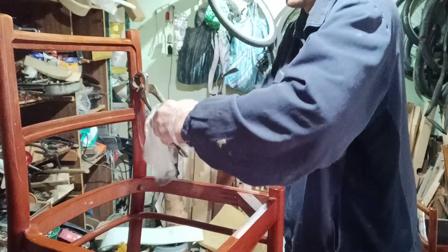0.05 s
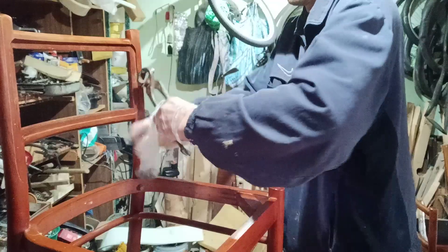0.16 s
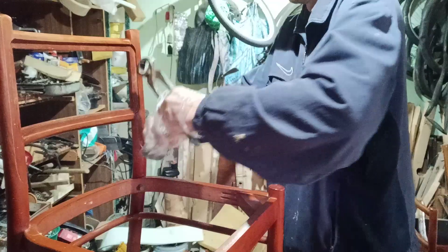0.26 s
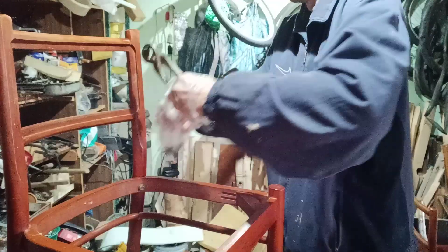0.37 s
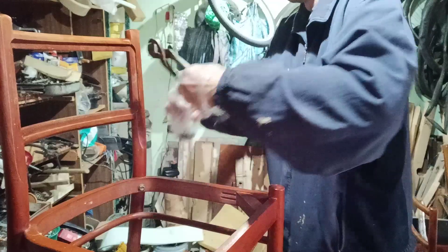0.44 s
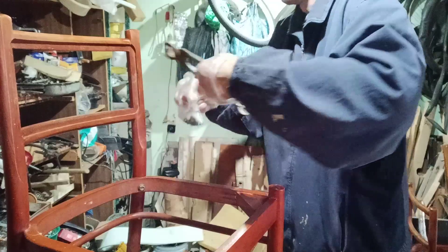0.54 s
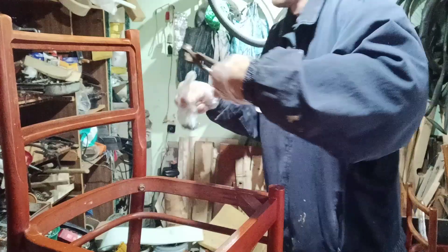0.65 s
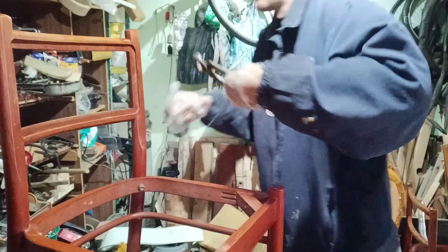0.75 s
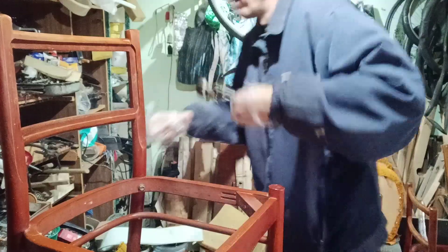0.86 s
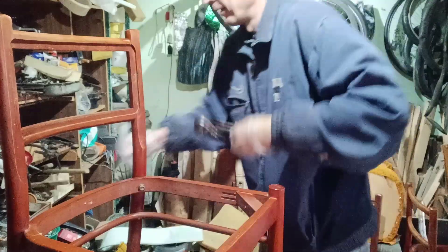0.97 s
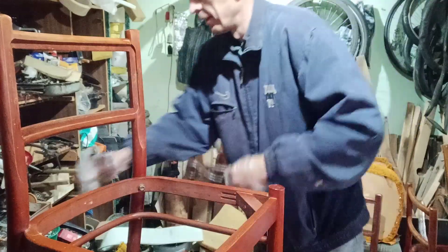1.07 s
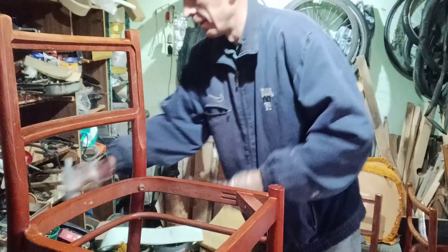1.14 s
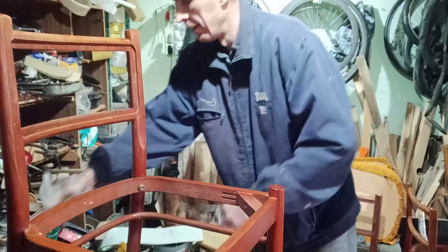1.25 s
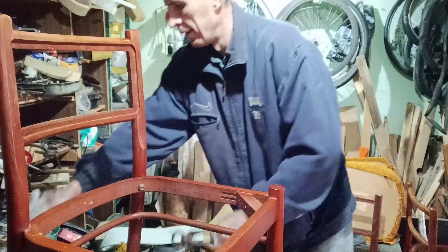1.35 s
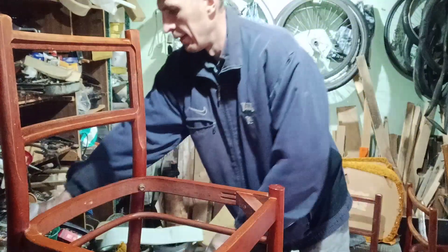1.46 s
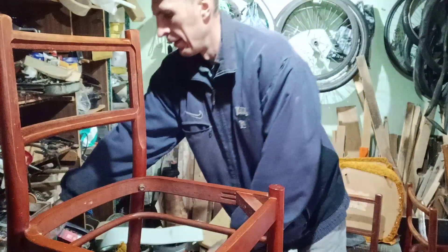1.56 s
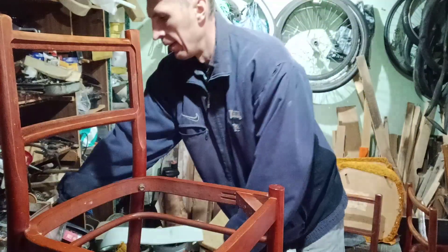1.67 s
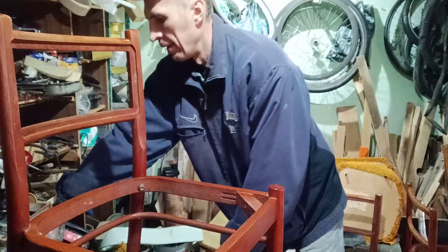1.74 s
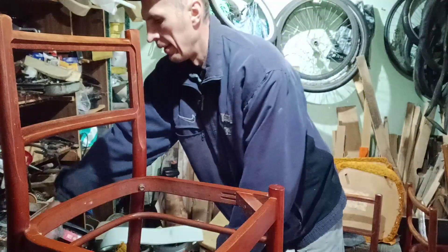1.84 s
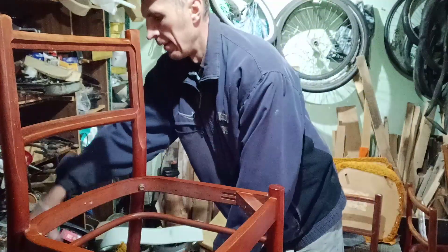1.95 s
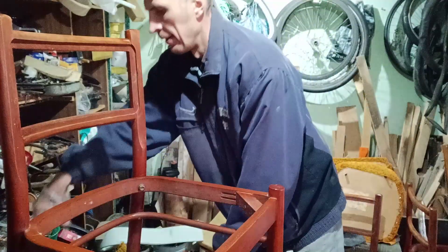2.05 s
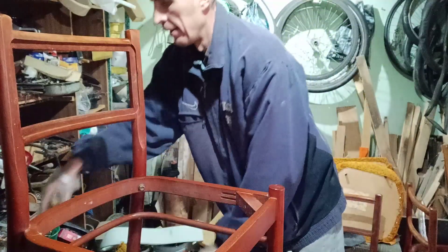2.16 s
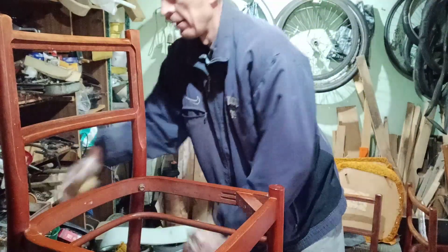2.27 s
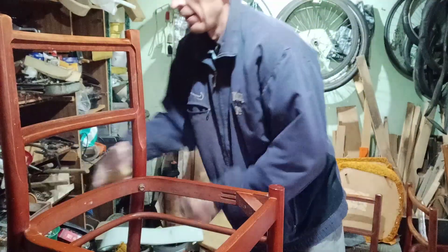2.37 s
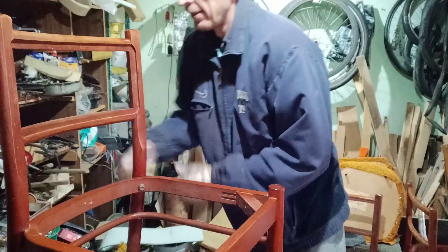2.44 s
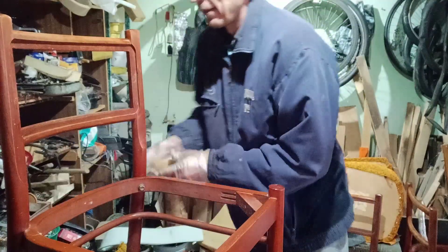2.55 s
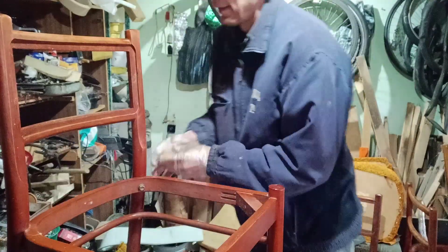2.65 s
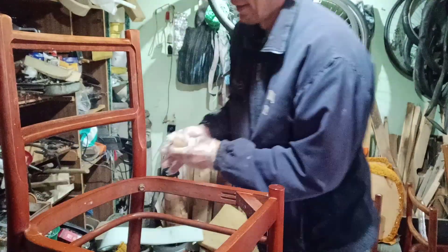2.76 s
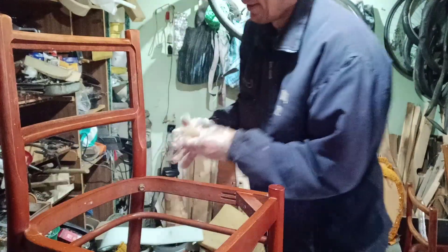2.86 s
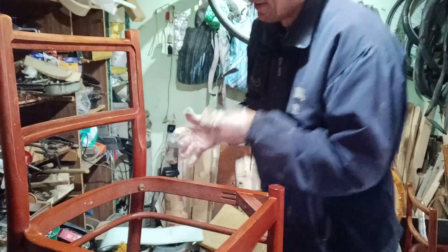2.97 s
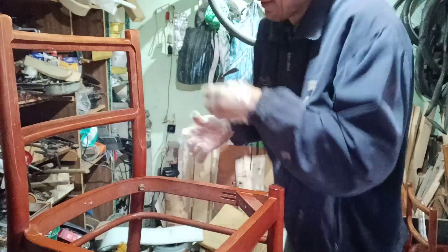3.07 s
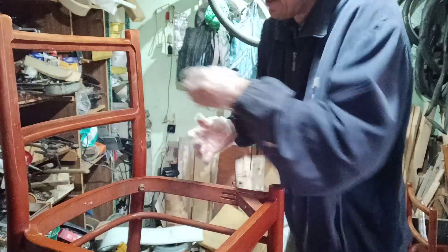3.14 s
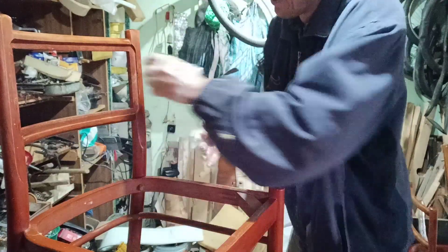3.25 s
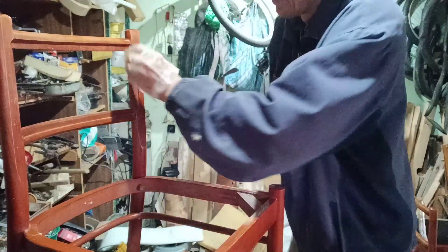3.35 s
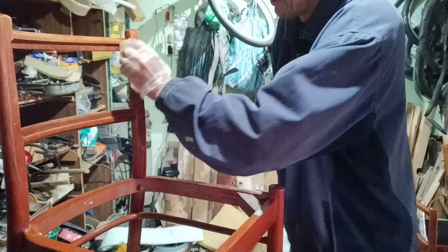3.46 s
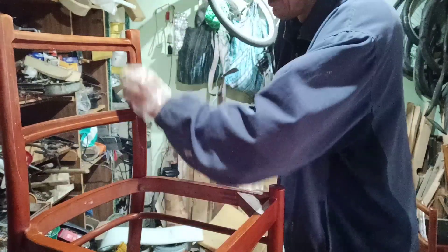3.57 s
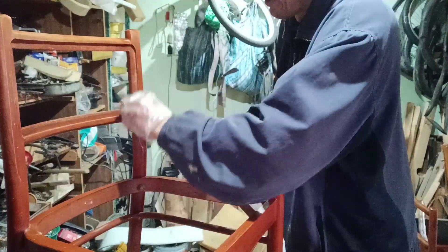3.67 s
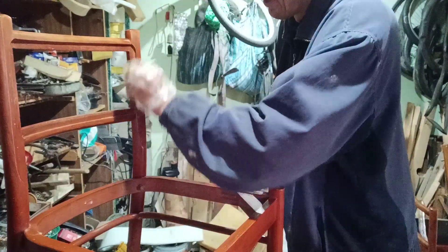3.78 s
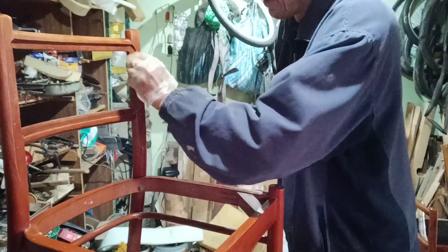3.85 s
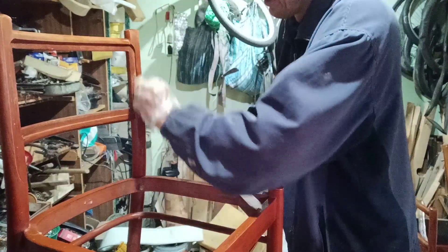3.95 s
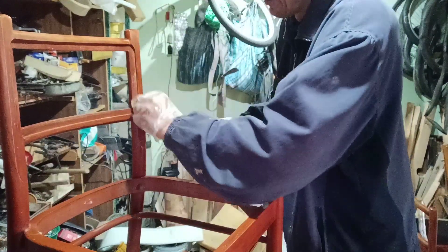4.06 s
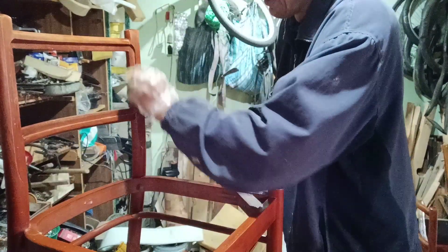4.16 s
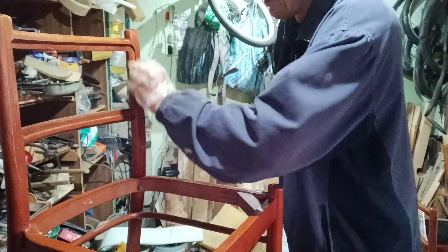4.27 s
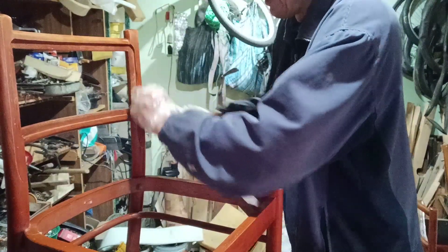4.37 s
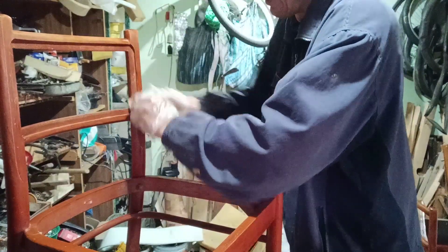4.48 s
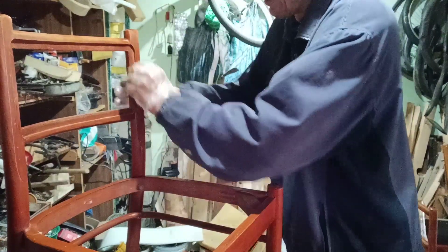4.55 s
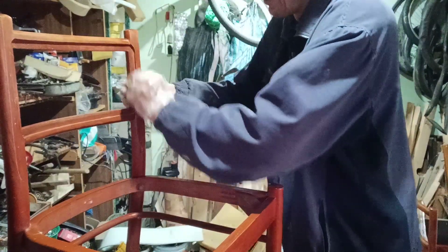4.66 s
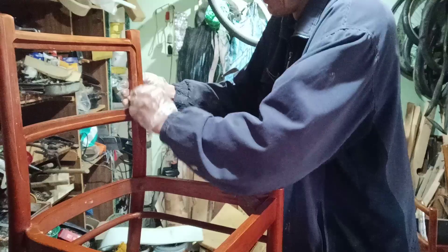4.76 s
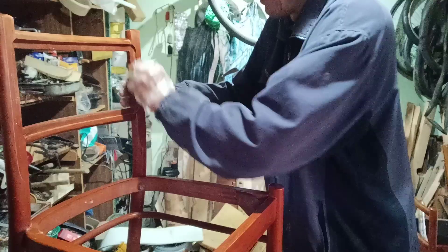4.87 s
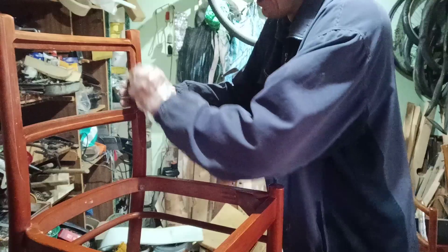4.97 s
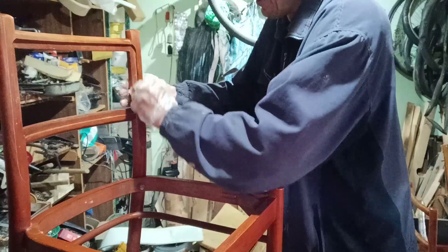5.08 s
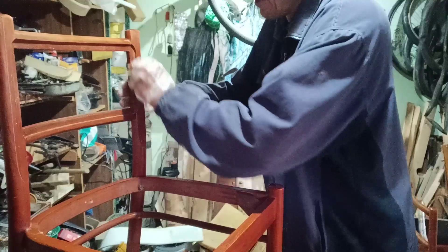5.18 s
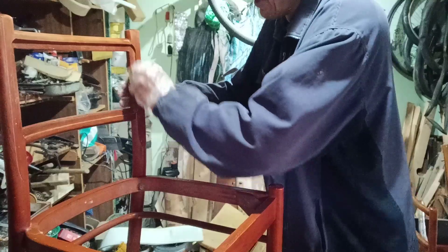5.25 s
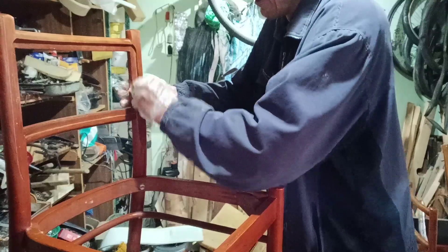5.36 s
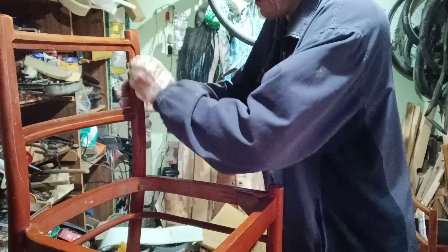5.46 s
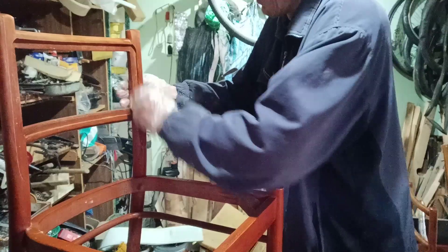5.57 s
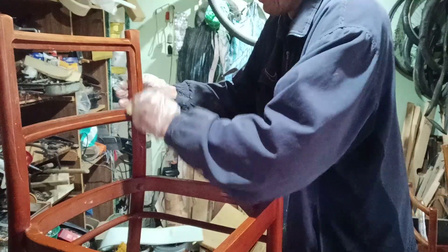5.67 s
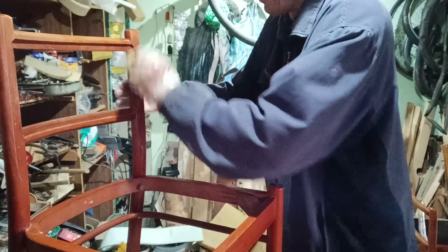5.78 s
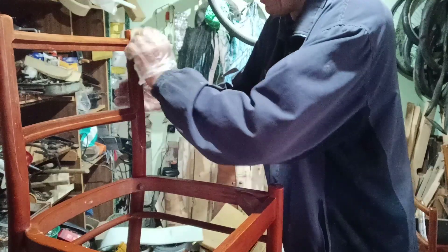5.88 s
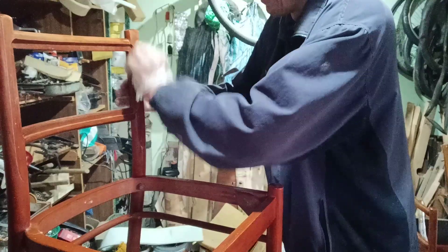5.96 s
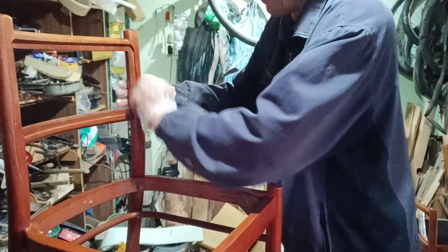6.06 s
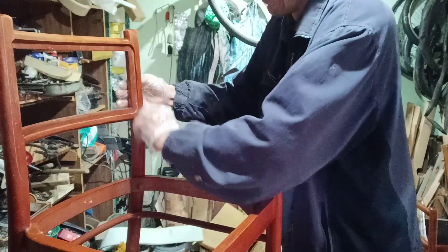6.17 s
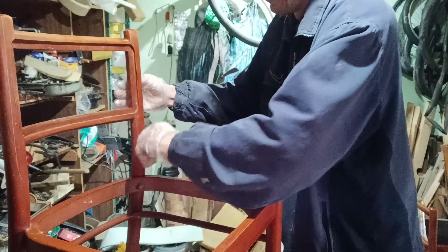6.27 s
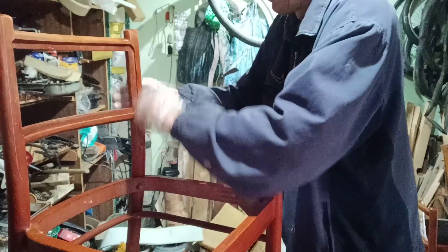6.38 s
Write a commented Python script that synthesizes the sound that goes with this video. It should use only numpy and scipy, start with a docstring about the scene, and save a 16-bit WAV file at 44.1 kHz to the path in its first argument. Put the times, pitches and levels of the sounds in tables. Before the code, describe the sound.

A close, bright, single-channel pickup in a small cluttered workshop with short, dense reflections and faint steady hiss. At 0 s a thin rough scrape fades on the chair post while a jacket swishes and the frame gives soft low thumps until 0.3 s. A light click comes at 0.5, a sharper cluster at 0.9, then hard clicks at 1.3, 1.6, 1.7 and 1.75. Pliers knock on a wooden shelf at 1.8, then rapidly from 2.04 to 2.13, with a brief shimmering steel ring; a weaker knock follows at 2.3. Sleeve rustle swells around 2.6 and thins by 3.4. From 3.6 to the end near 6.4 s, a rag wipes the lacquered backrest in short strokes. The frame shudders and thumps dully, with low groans at 4.0, 4.4 and 6.1, and small rising squeaks, mostly between 5.3 and 5.8. The last rub dies away into hiss.

```python
"""In a small, cluttered workshop a lacquered wooden chair is wiped with a rag, close to the microphone.
A jacket swishes, pliers click and are laid down with wooden knocks and a short metal ring.
Then the rag rubs the backrest in short strokes; the frame thumps, groans and squeaks under the hand.
Cloth is filtered noise, blows are noise bursts through resonances, and the tones are sines.
Clustered reflections die away around the blows; a faint hiss of the room lies beneath."""
import sys
import numpy as np
from scipy import signal
from scipy.fft import rfft, irfft, next_fast_len
from scipy.io import wavfile
from scipy.ndimage import map_coordinates

SR = 44100
rng = np.random.default_rng(int(sys.argv[2]) if len(sys.argv) > 2 else 0)


def generate_wav(sig):
    """Save sig (samples, or channels by samples) to the path in sys.argv[1] as 16-bit PCM at SR."""
    pcm = np.round(np.clip(np.atleast_2d(sig).T, -1, 1) * 32767).astype(np.int16)
    wavfile.write(sys.argv[1], SR, pcm)


N = 283122   # samples
T = np.arange(N) / SR   # seconds

# resonances of the chair frame: centre_hz, width_hz, level_db
FRAME_MODES = [(116, 35.6, -1), (137.8, 9.3, 6), (211.4, 11.4, 6.5), (276, 39, -0.5), (319.3, 27, -2.5),
               (379, 13, -4.5), (629, 59, -27.5), (870, 120, -55)]


def from_db(db):
    """Decibels to gain."""
    return 10 ** (np.asarray(db) / 20)


def rms(x):
    """Root mean square."""
    return np.sqrt(np.mean(x ** 2) + 1e-20)


def at_hz(points, hz):
    """Read a table on a log-frequency axis."""
    f, value = np.transpose(points)
    return np.interp(np.log(hz + 1e-9), np.log(f), value)


def cut(x, hz, kind, order=2):
    """Causal Butterworth filter."""
    edge_hz = np.clip(hz, 10, .45 * SR)
    return signal.sosfilt(signal.butter(order, edge_hz, kind, fs=SR, output="sos"), x)


def resonate(x, hz, width_hz):
    """Two-pole resonance with gain 1 on top."""
    r = np.exp(-np.pi * width_hz / SR)
    zeros = np.array([1, 0, -1]) * (1 - r * r) / 2
    poles = [1, -2 * r * np.cos(2 * np.pi * hz / SR), r * r]
    return signal.lfilter(zeros, poles, x + 1e-18)


def body(x, modes):
    """Parallel resonances of alternating sign."""
    return sum((-1) ** k * from_db(db) * resonate(x, hz, width_hz)
               for k, (hz, width_hz, db) in enumerate(modes))


def colour(x, spectrum):
    """Filter a steady sound by a table of frequency and gain."""
    size = next_fast_len(N)
    hz = np.arange(size // 2 + 1) * SR / size
    return irfft(rfft(x, size) * from_db(at_hz(spectrum, hz)), size)[:N]


def drift(per_s):
    """Slow chance with a spread near 1: random points joined by straight lines."""
    return np.interp(T * per_s, np.arange(4000), rng.standard_normal(4000))


def swell(s, rise_s, fall_s):
    """A rounded rise and fall around one moment; a rise or fall time away it is just under half height."""
    side_s = np.where(T < s, rise_s, fall_s)
    return 1 / np.cosh(np.clip(1.405 * (T - s) / side_s, -20, 20))


def add(out, s, sound):
    """Mix a sound in at a time."""
    start = int(s * SR)
    out[start:start + len(sound)] += sound[:N - start]


def at_level(blow, db):
    """Set the level of a blow's first 30 ms."""
    return from_db(db) * blow / rms(blow[:SR * 3 // 100])


def cloth():
    """The jacket swishes brightly as the arm moves; the rag rubs lower on the lacquer."""
    # timbre of the jacket, then of the rag: freq_hz, relative_db
    jacket_spectrum = [(200, -28.5), (550, -27), (800, -25), (1200, -21.5), (2000, -26.5), (3000, -20),
                       (4200, -2), (6000, -1.5), (7500, 2.5), (9000, 1.5), (11500, 3.5), (15000, 6)]
    rag_spectrum = [(200, -15), (500, -22), (800, 0), (1150, -9.5), (1500, -3.5), (3000, 3.5), (4500, 2.5),
                    (6000, -3), (8000, -2.5), (11000, -10.5), (15000, -11)]
    jacket_gain, rag_gain = effort()
    room = workshop(direct_db=11.5)
    jacket = signal.fftconvolve(friction(350, grain_db=-13.0, flutter_db=0.85), room)[:N]
    rag = signal.fftconvolve(friction(1100, grain_db=-14.5, flutter_db=2.5), room)[:N]
    jacket = colour(moving(jacket, echo_gain=0.26, travel_s=.00008), jacket_spectrum)
    rag = colour(moving(rag, echo_gain=0.46, travel_s=.00009), rag_spectrum)
    # each gain sets the level in the band where that cloth is judged
    jacket /= rms(cut(jacket, [9000, 15500], "band"))
    rag /= rms(cut(rag, [1500, 4500], "band"))
    return jacket * jacket_gain + rag * rag_gain


def effort():
    """Gains of jacket and rag: the arms' long motion, then one swell for each stroke; their powers add."""
    # the arms move without a pause until the wiping starts: time_s, swish_db (before the trim below)
    arm_motion = [(0.0, -56), (0.16, -53.5), (0.33, -50), (0.4, -51.5), (0.58, -54), (0.82, -63.5),
                  (1.01, -60), (1.26, -66), (1.4, -56.5), (1.66, -53.5), (2.64, -49.5), (3.17, -68),
                  (3.32, -56.5), (3.43, -73)]
    # stray brushes at first, then the wipes: height_s, rag_db, sleeve_db, rise_s, fall_s
    strokes = [(.245, -52.5, -46, 0.066, 0.043), (.46, -61, -54.5, 0.15, .07),
               (.67, -64.5, -58, .025, 0.016), (.84, -69.5, -54, 0.057, 0.037),
               (1.26, -66, -61, 0.084, 0.088), (2.0, -54.5, -57, 0.018, 0.14), (2.37, -64.5, -65, .05, .05),
               (2.59, -60.5, -59, .08, .1), (2.81, -59, -52, .03, 0.066), (3.139, -73.5, -56, .06, .13),
               (3.57, -71.5, -59, .06, .08), (3.648, -48.5, -49.5, 0.0057, 0.038),
               (3.74, -79, -59, 0.024, 0.03), (3.84, -85, -70, 0.027, 0.018),
               (3.937, -63.5, -59.5, 0.0028, .04), (4.01, -72, -83.5, .03, 0.031),
               (4.24, -82, -69, 0.042, .05), (4.322, -70.5, -56.5, 0.023, 0.034),
               (4.4, -72, -74, 0.029, .025), (4.48, -79.5, -63.5, .03, 0.049),
               (4.679, -57, -49.5, 0.038, 0.087), (4.896, -65, -56, .04, 0.037),
               (5.031, -54, -62, 0.026, 0.036), (5.19, -59.5, -60.5, 0.037, 0.023),
               (5.305, -53, -63, .02, 0.046), (5.449, -57.5, -60, 0.04, 0.024),
               (5.565, -52.5, -55, 0.024, 0.055), (5.79, -82, -60.5, 0.049, 0.084),
               (5.94, -79, -58, 0.079, 0.057), (5.98, -56, -54.5, 0.012, 0.054),
               (6.13, -69.5, -58.5, 0.051, 0.14)]
    trim_db, rest_db = -2.5, -76   # rest: what stays of the swish between wipes
    s, swish_db = np.transpose(arm_motion)
    arms = from_db(np.interp(T, s, swish_db + trim_db, right=rest_db))
    jacket_power = arms ** 2
    rag_power = (arms * from_db(-15)) ** 2   # the rag rustles along in the moving hand
    for s, rag_db, sleeve_db, rise_s, fall_s in strokes:
        speed = swell(s, rise_s, fall_s)
        jacket_power = jacket_power + (from_db(sleeve_db) * speed) ** 2
        rag_power = rag_power + (from_db(rag_db) * speed) ** 2
    return np.sqrt(jacket_power), np.sqrt(rag_power)


def friction(grains_per_s, grain_db, flutter_db):
    """Countless fibres slide as a hiss; some snag and let go as tiny ticks."""
    snagged = rng.random(N) < grains_per_s / SR
    snags = snagged * rng.standard_normal(N) * rng.exponential(1, N)
    hiss = rng.standard_normal(N)
    return (hiss + from_db(grain_db) * snags / rms(snags)) * from_db(flutter_db * drift(60))


def moving(x, echo_gain, travel_s):
    """Echoes off the rails and sleeves shift as the hand moves and comb the sound with drifting bands."""
    out = x
    for k, lag_s in enumerate(np.geomspace(.0007, .006, 6)):
        lag = lag_s * rng.uniform(.8, 1.2) + travel_s * drift(5)
        out = out + (-1) ** k * echo_gain * map_coordinates(x, [(T - lag) * SR], order=3)
    return out


def chair():
    """The frame shudders, thumps, groans and squeaks as the rag drags on it; its back post is scraped."""
    shudder = cut(body(rng.standard_normal(N), FRAME_MODES), 170, "low", order=3)
    return pressure() * shudder / rms(shudder) + thumps() + groans() + squeaks() + scrape()


def pressure():
    """Gain of the shudder: each press on the frame builds quickly, holds and lets go."""
    # the hand bears on the frame: start_s, end_s, level_db
    presses = [(0.05, 0.617, -65), (3.585, 4.215, -53.5), (4.309, 4.473, -48.5), (4.677, 5.28, -65.5),
               (5.318, 5.806, -57.5), (5.99, 6.187, -57)]
    attack_s, release_s = 0.0074, 0.047
    out = 0
    for start, end, db in presses:
        build = np.clip((T - start) / attack_s, 0, 1)
        out = out + from_db(db) * build * np.exp(-np.maximum(T - end, 0) / release_s)
    return out


def thumps():
    """A soft push on the frame, and its modes ringing after it."""
    # the hand catches and slips: start_s, level_db (after the low-pass), edge_hz (raised 9 % below)
    catches = [(0.0978, -41, 322), (0.136, -68, 230), (0.2186, -44.5, 245), (.259, -56, 230),
               (.3, -52, 243), (0.903, -62.5, 134.5), (1.321, -63.5, 142), (3.587, -49.5, 255),
               (3.648, -43.5, 330), (3.696, -44, 311), (3.8139, -49.5, 284), (4.165, -66, 245),
               (4.313, -47, 280), (4.486, -75, 228), (4.675, -46.5, 258), (4.735, -39.5, 334),
               (4.99, -47, 276), (5.313, -41, 445), (5.434, -50.5, 734), (5.486, -51, 200),
               (5.554, -39.5, 520), (5.708, -43, 405), (5.984, -53, 303)]
    out = np.zeros(N)
    for s, db, edge_hz in catches:
        push = workshop(direct_db=-1.5, hold_s=0.015)
        thud = body(push, FRAME_MODES) + from_db(-13.0) * cut(push, 100, "high", order=3)
        add(out, s, at_level(cut(thud, 1.09 * edge_hz, "low", order=4), db))
    return out


def groans():
    """Stick and slip: a nearly steady fundamental, overtones roughened by uneven slips, a rasp each slip."""
    # the rag sticks and slips in step with the frame: height_s, level_db, pitch_hz, rise_s, fall_s
    slips = [(4.035, -37.5, 153, 0.018, 0.028), (4.394, -29.5, 156.8, 0.023, 0.032),
             (6.067, -30, 155.9, 0.026, 0.032)]
    out = 0
    wander_s = np.cumsum(0.0121 * drift(70)) / SR   # bends the pitch by about 1 %
    rasp = cut(rng.standard_normal(N), [350, 1100], "band")
    for s, db, hz, rise_s, fall_s in slips:
        phase = 2 * np.pi * hz * (T + wander_s)
        groan = np.sin(phase)
        for k in range(2, 8):
            overtone = np.sin(k * phase + 2.0 * drift(55))
            groan = groan + from_db(-11.5 - 23 * np.log2(k / 2)) * (1 + .5 * drift(120)) * overtone
        groan = groan + from_db(-34.5) * (1 + np.sin(phase)) * rasp / rms(rasp)
        out = out + from_db(db) * swell(s, rise_s, fall_s) * cut(groan, 1300, "low") / rms(groan)
    return out


def squeaks():
    """Cloth squeaks on lacquer: the pitch climbs as the rag gathers speed; the grip is ragged."""
    # height_s, level_db (before grip and room), pitch_hz (midway in the climb), rise_s, fall_s
    chirps = [(3.779, -68, 655, 0.036, 0.021), (4.041, -71.5, 679, 0.044, 0.027),
              (4.401, -66.5, 658, 0.025, 0.037), (5.325, -61.5, 600, 0.013, 0.024),
              (5.444, -52, 634.4, 0.011, 0.017), (5.53, -57.5, 664, 0.018, 0.026),
              (5.619, -54, 643, 0.014, 0.012), (5.718, -59.5, 646, .013, 0.015),
              (5.805, -63.5, 650, 0.014, 0.015), (6.068, -58, 614, 0.018, 0.021)]
    climb, climb_s, unevenness = .36, 0.0178, .07   # climb each way and unevenness: shares of the pitch
    out, ragged, grip = 0, drift(600), 1 + 0.91 * drift(250)
    for s, db, hz, rise_s, fall_s in chirps:
        pitch_hz = hz * (1 + climb * np.tanh((T - s) / climb_s) + unevenness * ragged)
        phase = 2 * np.pi * np.cumsum(pitch_hz) / SR
        squeak = np.sin(phase) + from_db(-19) * np.sin(2 * phase)
        out = out + from_db(db) * squeak * grip * swell(s, rise_s, fall_s)
    return signal.fftconvolve(out, workshop(direct_db=3.5))[:N]


def scrape():
    """A thin scrape on the back post: two rough, level tones that fade as the hand leaves it."""
    # one swell: height_s, rise_s, fall_s
    scrape_swell = (0.024, .06, 0.049)
    # pitch_hz, level_db
    scrape_tones = [(805, -62), (1750, -59)]
    out = 0
    for hz, db in scrape_tones:
        pitch_hz = hz * (1 + .014 * drift(691.5))
        tone = np.sin(2 * np.pi * np.cumsum(pitch_hz) / SR) * (1 + 1.06 * drift(254))
        out = out + from_db(db) * tone / rms(tone)
    return out * swell(*scrape_swell)


def pliers():
    """Hard clicks, then knocks on the shelf and the ring of steel."""
    return clicks() + knocks() + clinks()


def clicks():
    """Pliers and odds and ends click: size sets the lower edge of a blow's noise, hardness the upper."""
    # start_s, level_db, low_edge_hz, high_edge_hz, ring_hz, ring_db (beside the click),
    # snap_db (direct chatter beside the room)
    hard_clicks = [(0.5035, -49.5, 1900, 9300, 2760, 6, 2), (0.894, -39, 1500, 13900, 4760, 8, 23),
                   (0.896, -29.5, 680, 14800, 3830, 3.5, -3), (0.908, -38.5, 1400, 1930, 1630, 26, 3.5),
                   (1.3159, -30, 434, 6500, 3640, 5, -2), (1.5839, -35, 700, 11020, 3440, 5.5, -4.5),
                   (1.6657, -26.5, 338, 4835, 3250, 10, -3), (1.7445, -36, 700, 6200, 3350, 1.5, -0.5),
                   (1.856, -44, 3000, 13460, 4630, -2, -3), (1.9551, -44, 1600, 7930, 3280, 8.5, -3),
                   (2.055, -45, 4000, 14970, 8100, -6, 0)]
    out = np.zeros(N)
    for s, db, low_hz, high_hz, ring_hz, ring_db, snap_db in hard_clicks:
        blow = contact(snap_db, chatter_s=0.0021)
        click = cut(cut(blow, low_hz, "high", order=3), high_hz, "low")
        click = click + from_db(-7.0) * cut(blow, 14000, "high")   # a thin tick rides on top
        ring = from_db(ring_db) * resonate(click, ring_hz, ring_hz / 10)
        add(out, s, at_level(click + ring, db))
    return out


def knocks():
    """Pliers bump on a wooden shelf; the spot they hit favours one range of its modes."""
    # start_s, level_db, high_edge_hz, favoured_hz, snap_db (direct chatter beside the room)
    bumps = [(1.828, -22.5, 1920, 480, -1), (2.038, -30, 1500, 540, -4), (2.0837, -20, 3160, 1500, -2),
             (2.111, -23, 2800, 1400, -1), (2.133, -27.5, 1900, 370, -2), (2.2734, -40, 1400, 560, 0)]
    # resonances of the shelf: centre_hz, width_hz, level_db
    shelf_modes = [(132, 27, 3.5), (252, 210, -3.5), (360, 24, -0.5), (407.5, 14, -1.5), (576, 47, -0.5),
                   (651, 41, 1), (856.4, 49, -2.5), (940, 38, -1), (975, 53, -10), (1341, 94, -2.5),
                   (1574, 64, -8.5), (1780, 52, -2.5), (1980, 360, -9), (3260, 600, -13.5)]
    out = np.zeros(N)
    for s, db, high_hz, favoured_hz, snap_db in bumps:
        blow = contact(snap_db, chatter_s=0.0017)
        crack = from_db(-8.5) * cut(cut(blow, 220, "high"), high_hz, "low")   # steel on wood
        wood = body(blow, shelf_modes)
        wood = wood + from_db(-2) * resonate(wood, favoured_hz, 0.38 * favoured_hz)
        add(out, s, at_level(cut(wood + crack, high_hz, "low"), db))
    return out


def clinks():
    """The steel jaws ring as they land: close pairs of modes beat, so each partial flickers as it dies."""
    # start_s, ring_level_db
    landings = [(2.1125, -32), (2.1305, -32)]
    # partials of the steel: freq_hz, relative_db (flickers below), t60_s
    steel_modes = [(4330, -17, .14), (5040, -10, .17), (5720, -15, .13), (6285, -10, .16), (6906, -16, .14),
                   (7125, 0, .16), (7975, -11, .14), (8207, -7, .17), (10200, -18, .15), (10808, -6, .16),
                   (12180, -7, .13), (12900, -11, .14), (13485, -4, .14), (14950, -14, .14)]
    out, t = np.zeros(N), T[:SR // 3]
    for s, db in landings:
        ring = 0
        for hz, mode_db, t60 in steel_modes:
            flicker = from_db(mode_db + 2 * drift(77)[:len(t)])
            partial = np.sin(2 * np.pi * (hz * t + rng.random()))
            ring = ring + flicker * partial * np.exp(-np.log(1000) * t / t60)
        jangle = cut(workshop(direct_db=-3.5), 4200, "high")
        add(out, s, at_level(ring, db) + at_level(jangle, db - 5.5))
    return out


def contact(snap_db, chatter_s):
    """Hard surfaces chatter for a moment as they meet; the room answers after that."""
    blow = workshop(direct_db=-20.0)
    t = T[:len(blow)]
    chatter = rng.standard_normal(len(t)) * np.exp(-t / chatter_s)
    chatter = chatter / np.sqrt(np.sum(chatter ** 2))
    return blow * (1 - np.exp(-t / 0.0016)) + from_db(snap_db) * chatter


def workshop(direct_db, hold_s=0.019):
    """The direct pulse, then dense reflections off the clutter that hold briefly and die by band."""
    # decay of the room: freq_hz, t60_s
    room_t60 = [(120, 0.3), (400, 0.21), (1000, 0.16), (2800, 0.18), (7000, 0.16), (15000, 0.2)]
    t = T[:SR // 3]
    white, tail = rng.standard_normal((2, len(t))), 0
    edges = np.geomspace(60, 19000, 11)
    for k, band in enumerate(zip(edges, edges[1:])):
        t60 = at_hz(room_t60, np.sqrt(band[0] * band[1]))
        decay = np.exp(-np.log(1000) * np.maximum(t - hold_s, 0) / t60)
        tail = tail + cut(white[k % 2], band, "band") * decay
    tail = tail * from_db(2.0 * drift(900)[:len(t)])   # single reflections stand out
    tail /= np.sqrt(np.sum(tail ** 2))
    tail[0] += from_db(direct_db)
    return tail


def room_air():
    """The faint hiss of the room: steady noise with a fixed spectrum."""
    # freq_hz, relative_db
    air_spectrum = [(30, 0.5), (120, 10.5), (300, 3.5), (1000, -3.5), (3500, -18), (6000, 9), (8000, 8.5),
                    (15000, -10.5)]
    air = colour(rng.standard_normal(N), air_spectrum)
    return from_db(-70.0) * air / rms(air)


def scene():
    """Cloth, chair and pliers over the hiss of the room, on one channel."""
    return (cloth() + chair() + pliers() + room_air())[None]


def record(dry):
    """The microphone has a presence peak and little bass; peaks are rounded and the top is cut."""
    bright = dry + (from_db(14) - 1) * resonate(dry, 6500, width_hz=1062)
    rounded = 0.54 * np.tanh(cut(bright, 47, "high") / 0.55)
    return signal.sosfilt(signal.ellip(10, .2, 70, 15800, fs=SR, output="sos"), rounded)


dry = scene()
out = record(dry)
generate_wav(out)
```